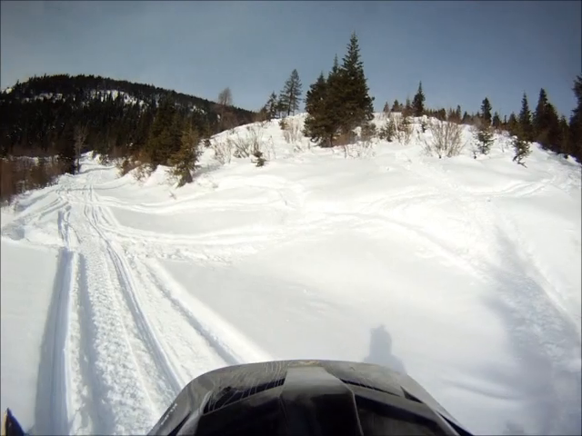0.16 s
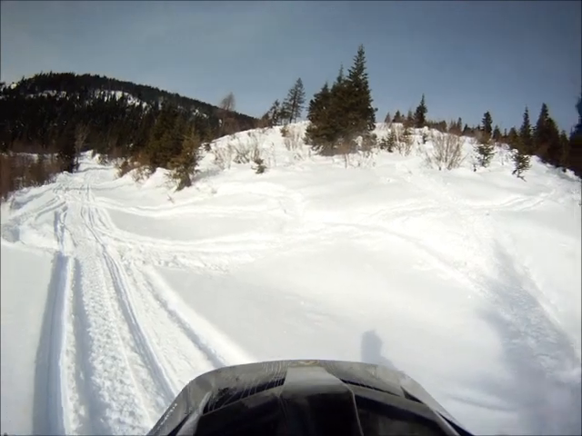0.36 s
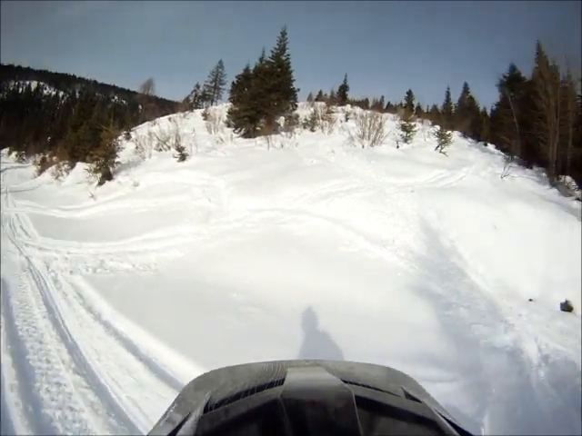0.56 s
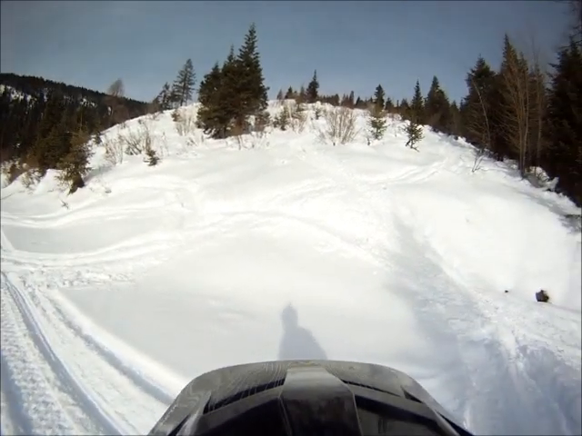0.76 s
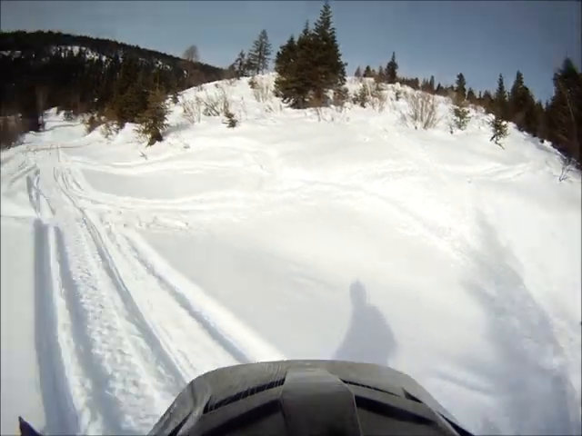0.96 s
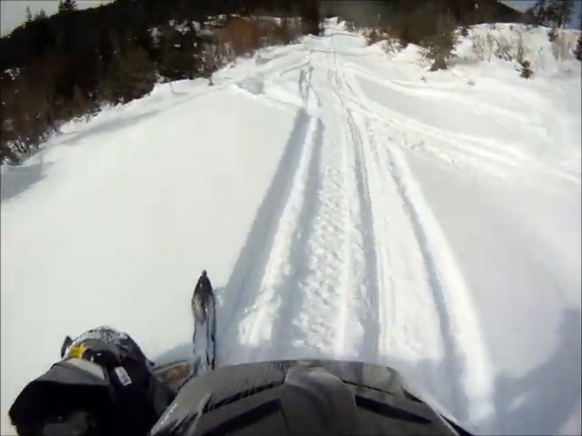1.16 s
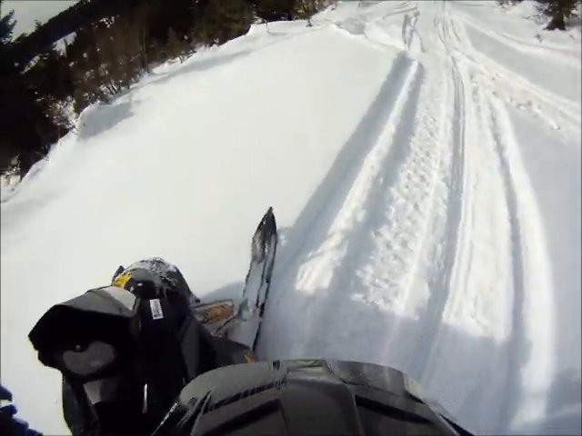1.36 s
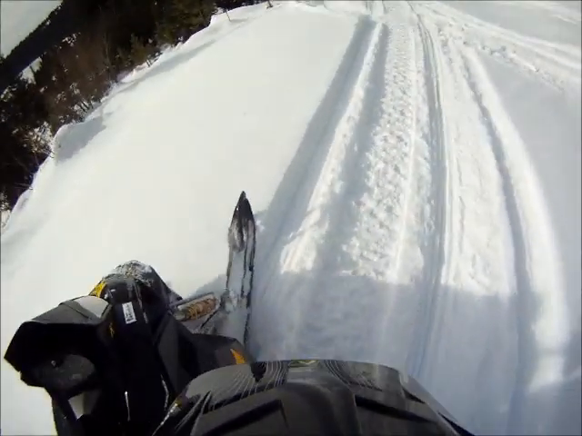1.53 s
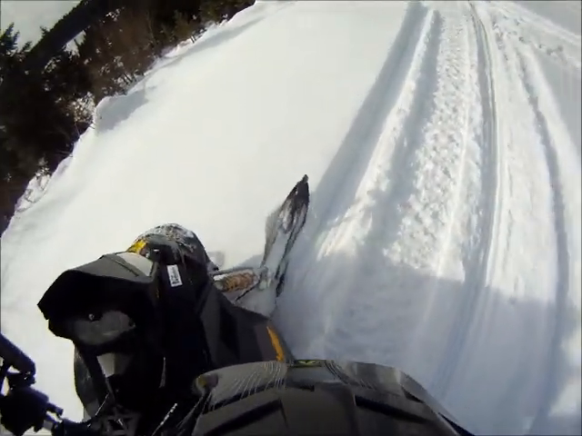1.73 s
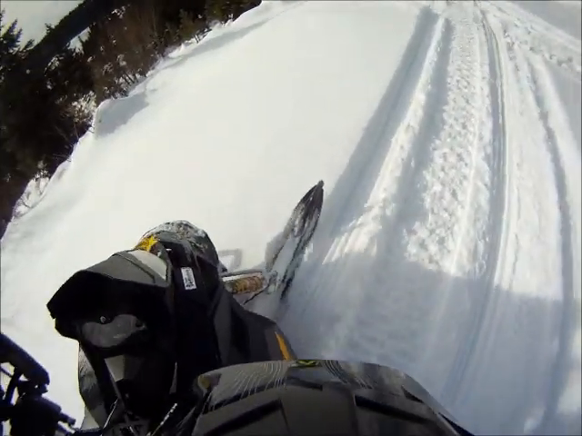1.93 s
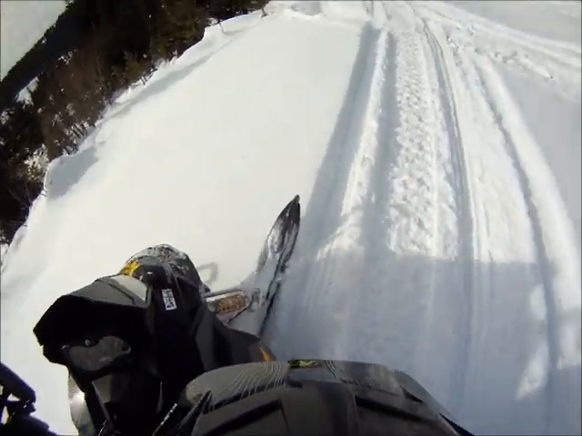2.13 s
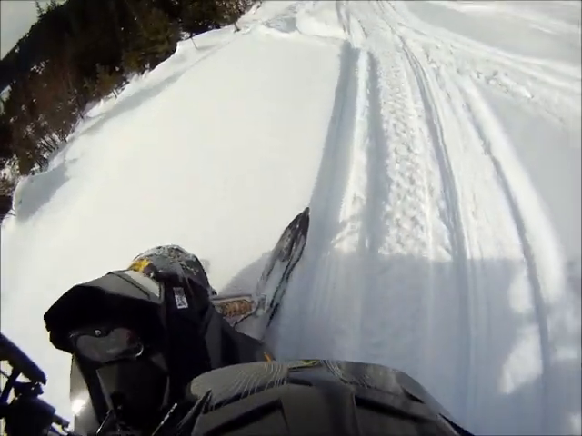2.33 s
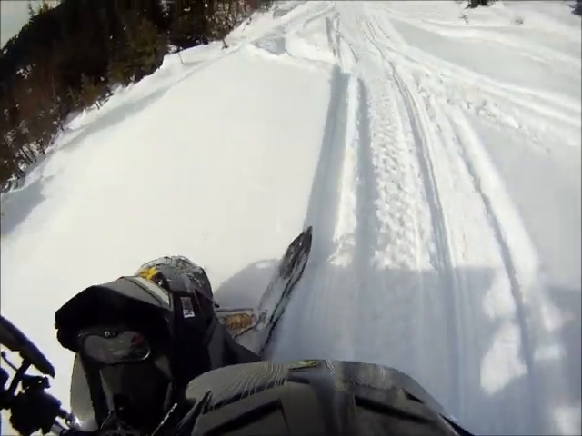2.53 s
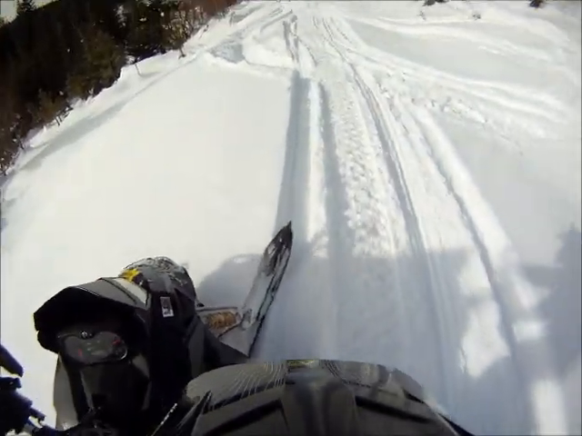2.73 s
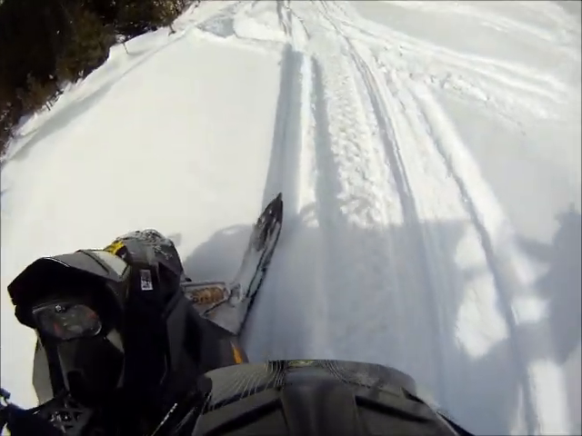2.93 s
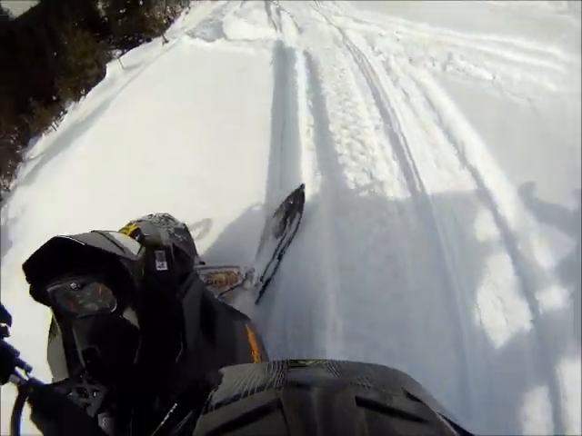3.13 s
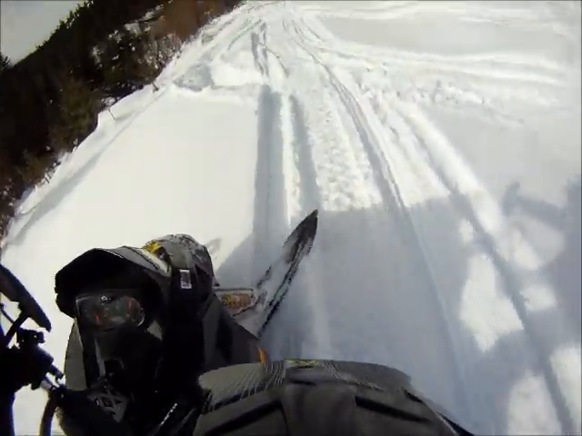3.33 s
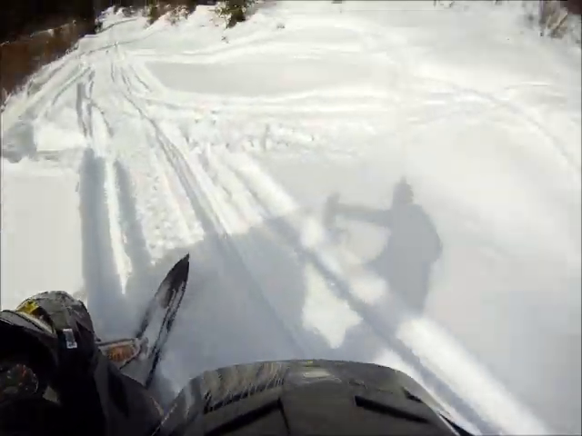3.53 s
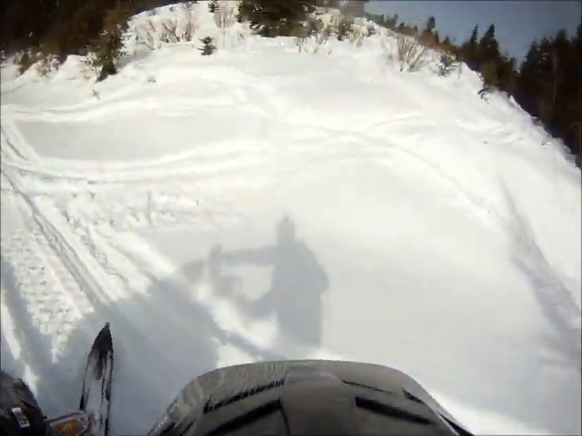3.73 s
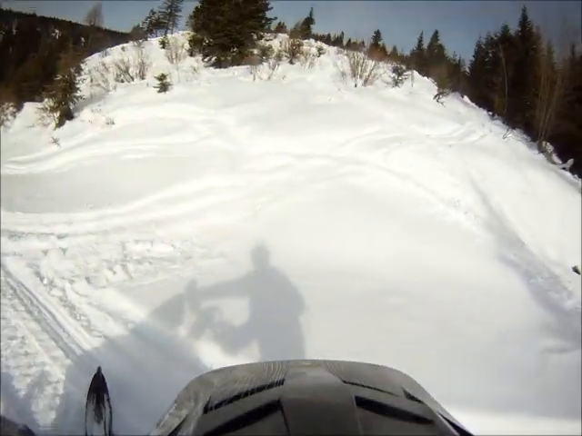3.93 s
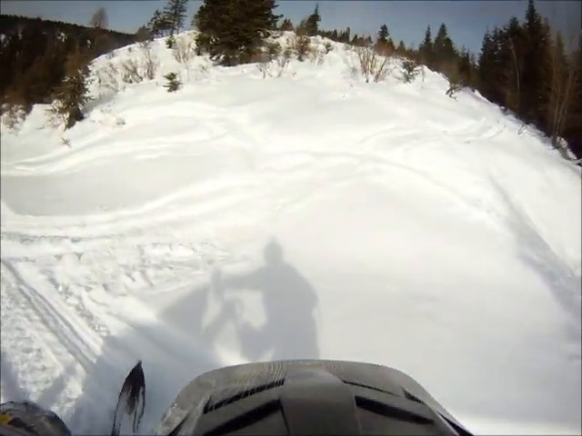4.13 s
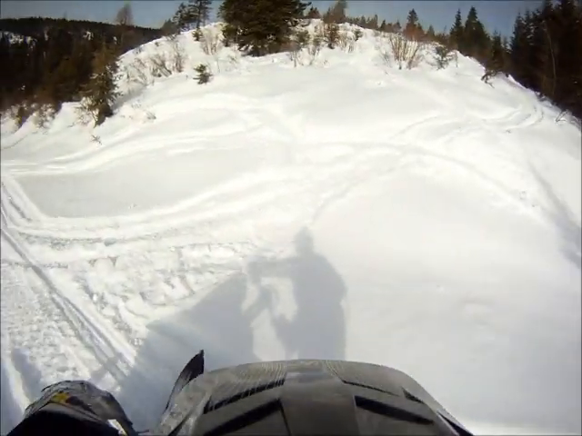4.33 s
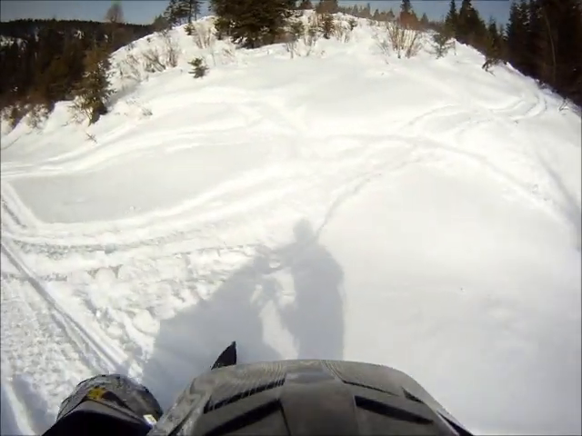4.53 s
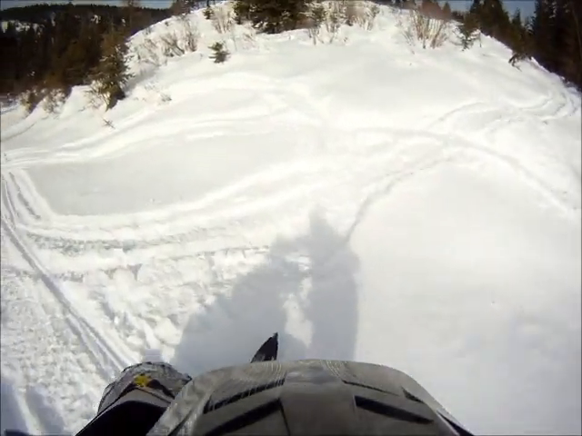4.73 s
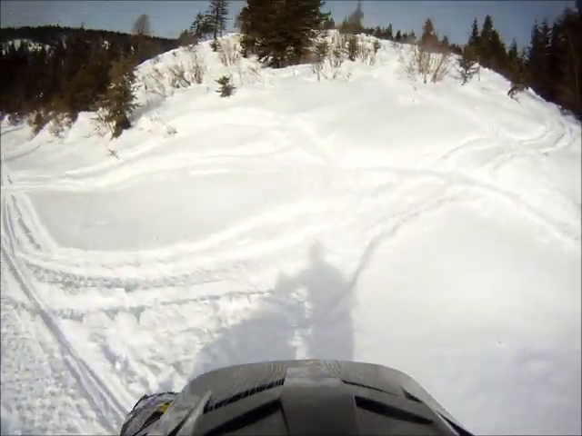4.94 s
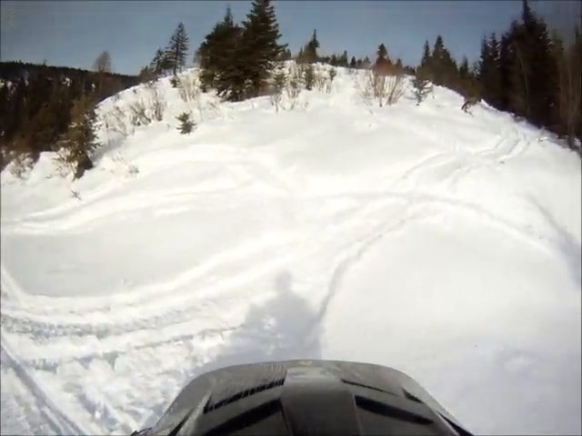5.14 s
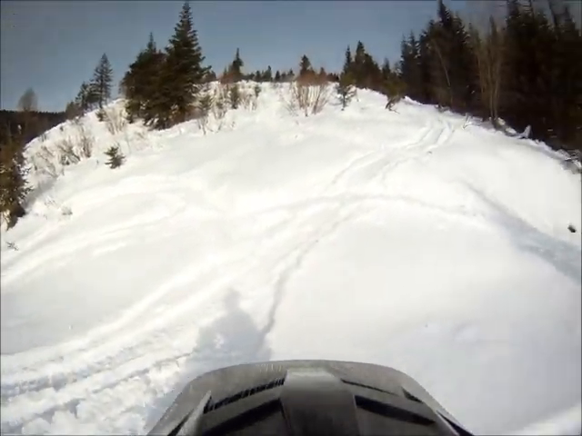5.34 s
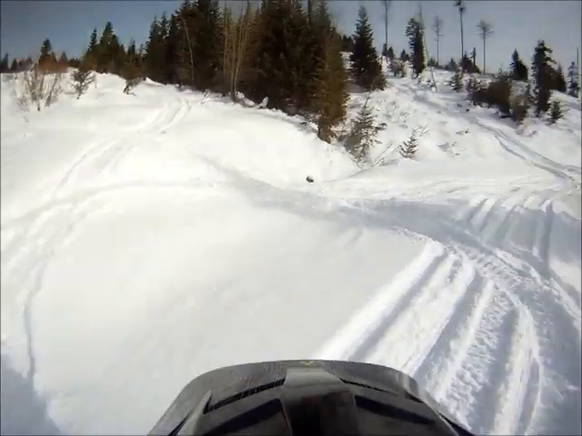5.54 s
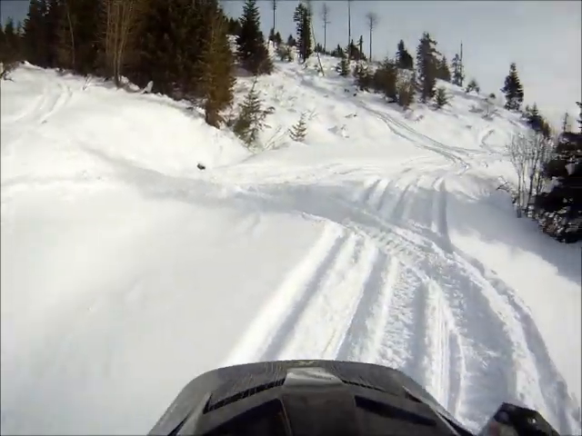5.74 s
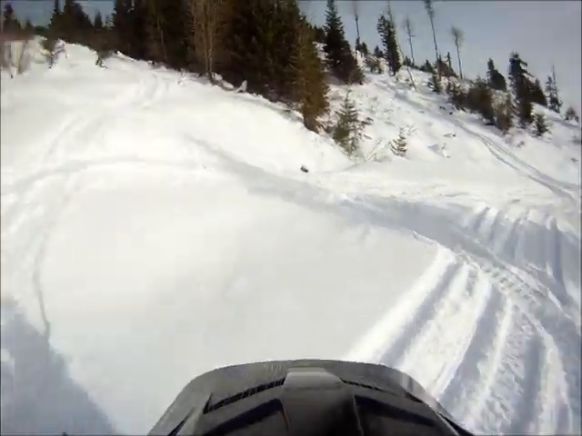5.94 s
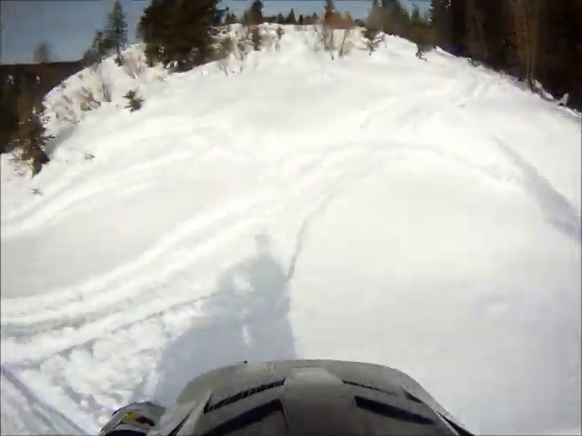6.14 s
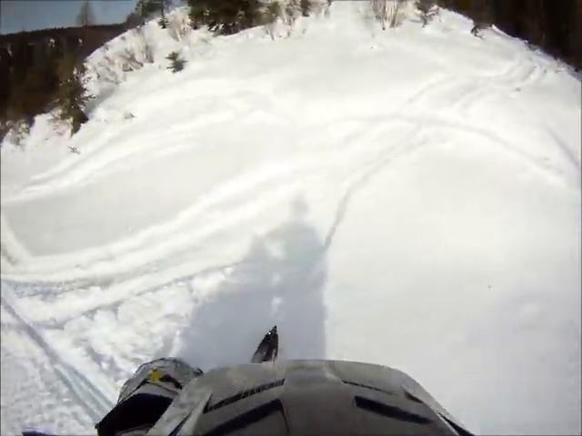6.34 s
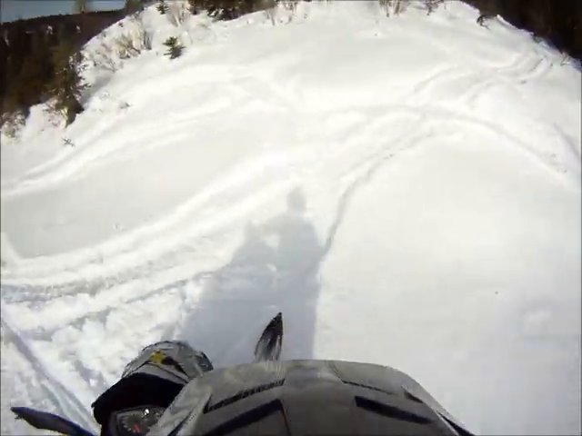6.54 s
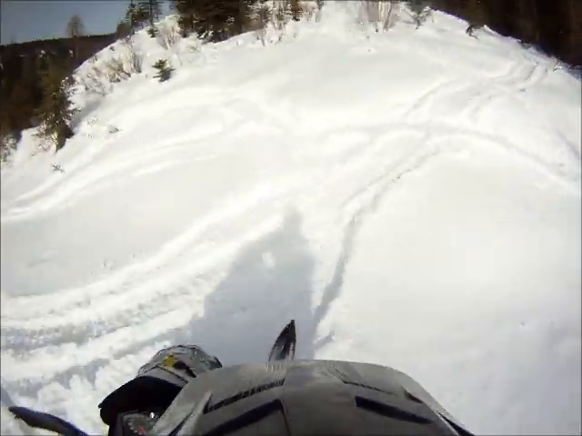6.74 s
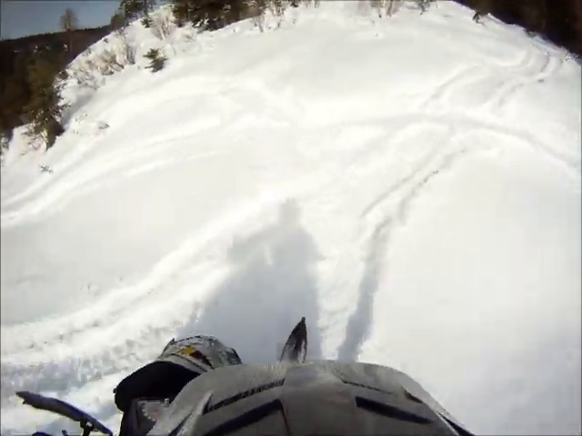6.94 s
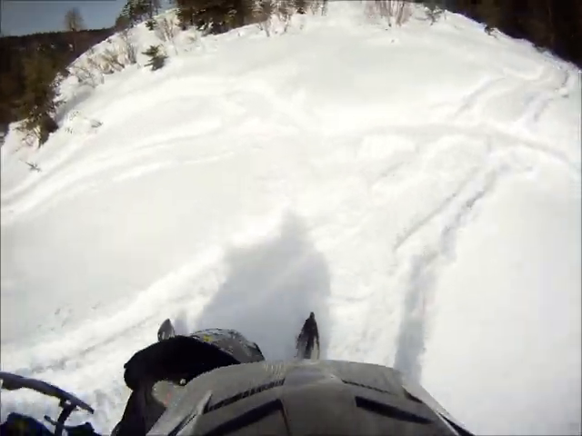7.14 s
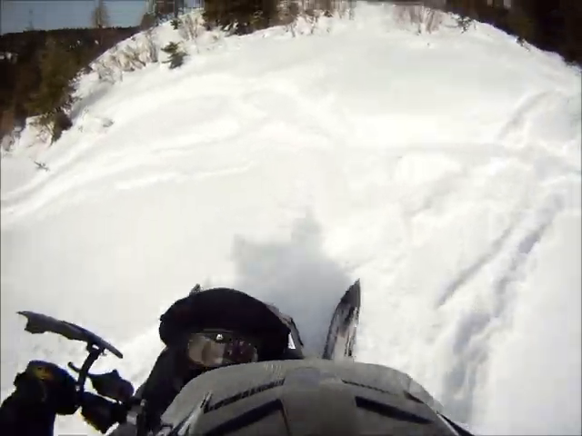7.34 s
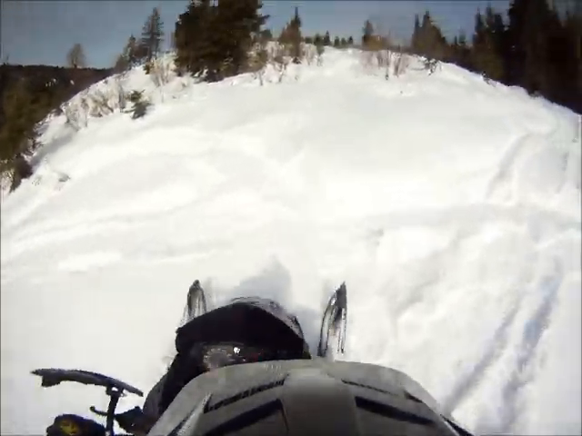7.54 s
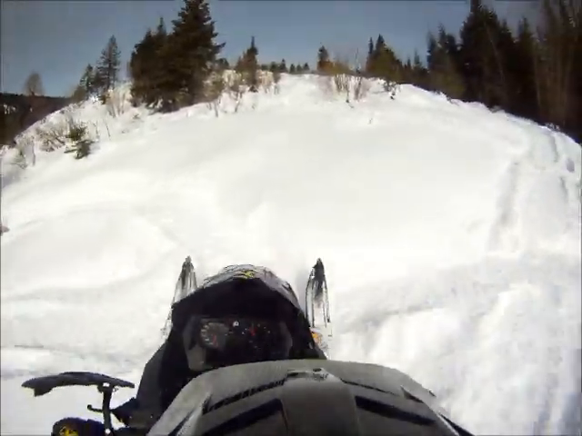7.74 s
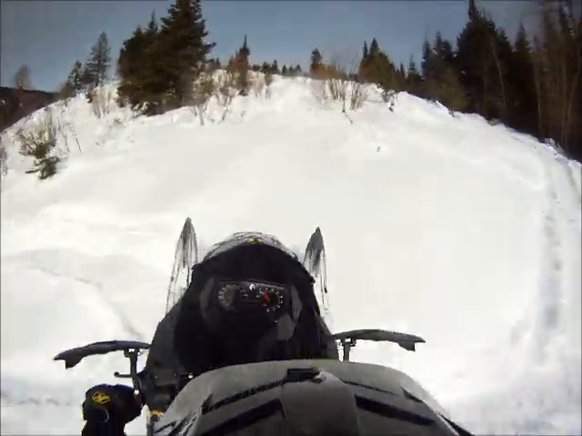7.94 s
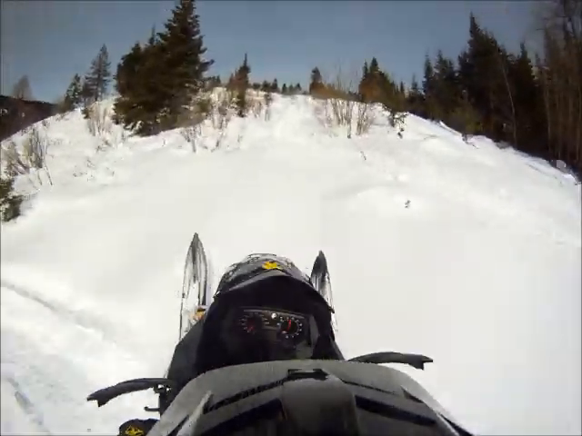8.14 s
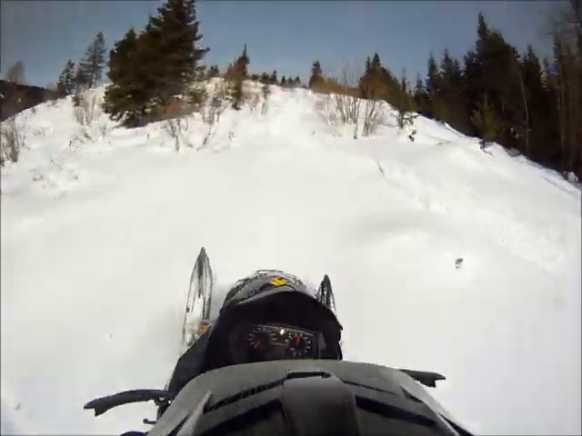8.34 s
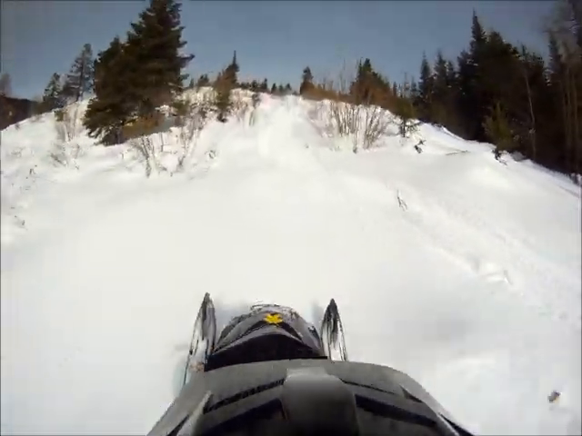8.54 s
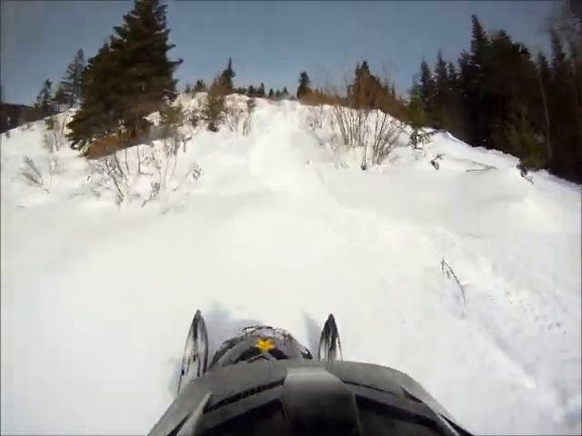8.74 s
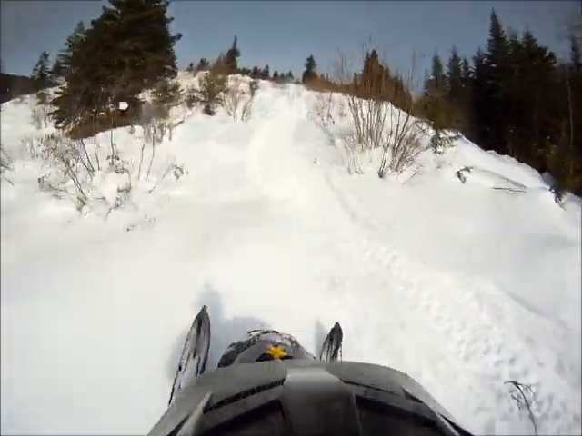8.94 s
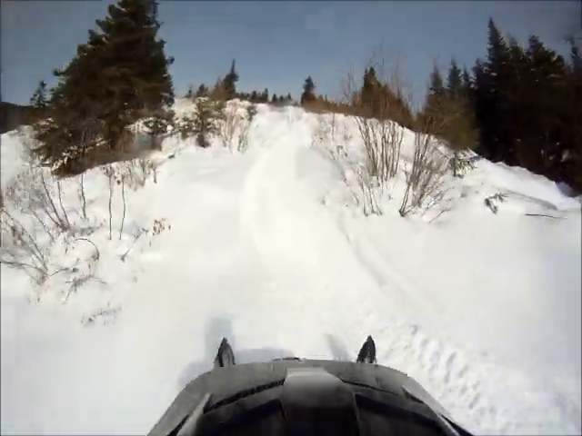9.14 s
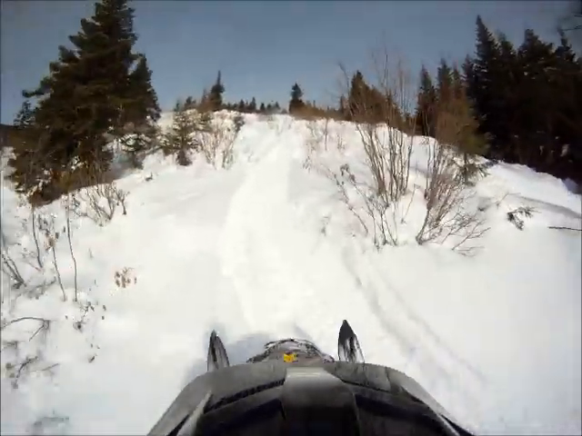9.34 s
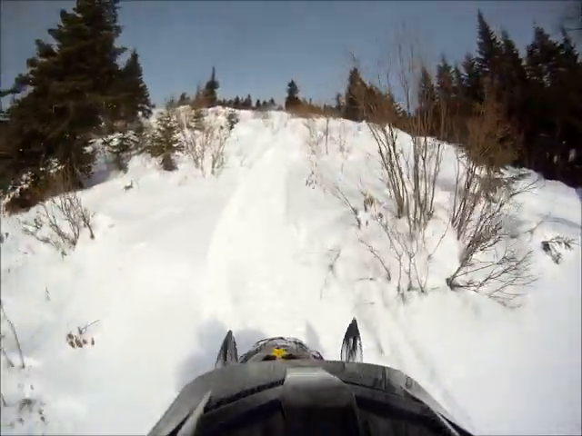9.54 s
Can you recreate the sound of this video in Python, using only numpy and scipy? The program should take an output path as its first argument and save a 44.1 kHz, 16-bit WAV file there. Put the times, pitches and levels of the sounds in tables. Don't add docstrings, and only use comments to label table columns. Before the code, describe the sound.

A low, uneven engine putter with jacket rustle opens the ride. The snowmobile is blipped several times, each rasp sagging into stumbling pops, then calms around the middle. Later surges climb to a loud buzzing whine, with a brief belt chirp and quick on-off bursts at the end. Close rider's microphone in a sealed case, dry open air, harsh low-quality treble.

```python
import sys
import numpy as np
from scipy import signal
from scipy.fft import rfft, irfft, next_fast_len
from scipy.io import wavfile
from scipy.ndimage import uniform_filter1d

SR = 44100
rng = np.random.default_rng(int(sys.argv[2]) if len(sys.argv) > 2 else 0)


def digitize_waveform(pressure):
    field = np.atleast_2d(pressure).T
    bounded = np.clip(field, -1, 1)
    quanta = np.round(bounded * 32767).astype(np.int16)
    wavfile.write(sys.argv[1], SR, quanta)


def elevation(decibels):
    levels = np.asarray(decibels, float)
    return 10 ** (levels / 20)


N = 422914


def level(x, db):
    return x * elevation(db) / np.sqrt(np.mean(x ** 2))


def colour(x, points):
    hz, db = np.transpose(points)
    size = next_fast_len(N)
    bins = np.arange(size // 2 + 1) * SR / size + 1
    gain = elevation(np.interp(np.log(bins), np.log(hz), db, right=-120))
    return irfft(rfft(x, size) * gain, size)[:N]


def ring(x, modes):
    out = 0
    for k, (hz, width, db) in enumerate(modes):
        b, a = signal.iirpeak(hz, hz / width, SR)
        out = out + (-1) ** k * elevation(db) * signal.lfilter(b, a, x)
    return out


def walk(rate):
    k = int(SR / rate / 32)
    steps = np.repeat(rng.standard_normal(N // (32 * k) + 1), k)
    slow = uniform_filter1d(uniform_filter1d(steps, k), k)
    return np.repeat(slow, 32)[:N]


def held(rows, slew_s):
    t = np.arange(N) / SR
    steps = sum(v * (t >= a) * (t < b) for a, b, v in rows)
    return uniform_filter1d(steps, size=int(slew_s * SR))


# frequency in Hz, density in dB per Hz.
WIND_SPECTRUM = [(20, -0.5), (40, -16), (70, -4), (150, -24), (400, -17.5)]


def wind():
    noise = level(colour(rng.standard_normal(N), WIND_SPECTRUM), -49.5)
    return noise * elevation(0.79 * walk(7.6))


# peak in seconds,
# rise and fall in seconds, peak in dB.
SCUFFS = [(.235, 0.039, .04, -48), (.27, .015, 0.036, -41.5), (.347, 0.022, 0.047, -39),
          (.41, 0.027, .02, -53), (.447, 0.034, 0.036, -41.5), (.535, .08, 0.018, -48.5),
          (.597, .012, 0.065, -54), (1.04, .04, .15, -54), (1.14, .008, .008, -53), (4.8, .2, .2, -53),
          (5.43, .01, .09, -68), (5.514, 0.044, 0.29, -48), (5.69, 0.01, 0.052, -53),
          (5.79, .015, .03, -62)]


def rustle():
    grains = rng.standard_normal(N) * elevation(1.5 * walk(150))
    bright = [(2410, 180, 0.66), (2710, 55, -0.92)]
    broad = [(1450, 210, 0), (2070, 170, -5.5), (3560, 1500, -36)]
    grains = ring(ring(grains, bright), bright) + ring(grains, broad)
    t, swell = np.arange(N) / SR, np.zeros(N)
    drop_db = 19
    for s, rise, fall, db in SCUFFS:
        near = slice(int((s - 2 * rise) * SR), int((s + 2 * fall) * SR))
        away = np.maximum((s - t[near]) / rise, (t[near] - s) / fall)
        swell[near] += elevation(db - drop_db * away)
    return level(grains, 0) * swell


# frequency in Hz, density in dB per Hz.
ROAR_SPECTRUM = [(40, -9.5), (90, -12), (160, -4), (250, -9.5), (450, -9), (600, -5), (800, -17),
                 (1000, -4), (2500, -8), (4000, -22), (5600, -24.5), (6000, -58)]


def roar(hz, clatter_db):
    noise = level(colour(rng.standard_normal(N), ROAR_SPECTRUM), 0)
    return noise * elevation(0.54 * clatter_db - 24 + 0.027 * (hz - 147) + 3.8 * walk(18))


# start in seconds, length in seconds, pitch in Hz, level in dB.
BELT_CHIRPS = [
    (8.147, 0.037, 1450, -26.5),
]


def chirps():
    t, out = np.arange(N) / SR, 0
    for s, length, hz, db in BELT_CHIRPS:
        gate = uniform_filter1d(1. * (t > s) * (t < s + length), size=250)
        out = out + elevation(db + 5.5) * gate * np.sin(2 * np.pi * hz * (t - s))
    return out


# time in seconds, peak in dB.
STRAY_FIRINGS = [(.25, -25), (.33, -25), (.428, -26), (0.5, -34.5), (0.593, -24.5), (.753, -30), (.804, -24),
                 (1.04, -27), (1.095, -24), (1.126, -22), (1.234, -25), (4.658, -23), (4.773, -26),
                 (4.854, -26), (4.941, -29), (5.009, -31), (5.113, -32), (5.159, -24), (5.186, -29),
                 (5.274, -26), (5.459, -27), (5.552, -28),
                 (1.565, -24), (1.998, -24), (2.19, -18.5), (2.3, -21), (2.419, -23.5), (2.545, -25),
                    (2.643, -18), (2.779, -19.5), (2.878, -25), (3.164, -24), (3.245, -16.5), (3.391, -16),
                    (3.488, -19.5), (3.574, -23), (3.664, -28), (3.873, -40), (3.922, -25.5), (4.243, -19),
                    (4.329, -20.5), (4.407, -30), (4.435, -23), (4.536, -20.5), (6.928, -18),
                    (7.003, -21.5), (7.068, -24), (8.173, -21), (8.787, -18)]
# first and last time in seconds, gap in seconds, peak in dB.
STUMBLE_RUNS = [
    (1.636, 1.8, .048, -16),
    (5.603, 5.78, .034, -28),
    (5.881, 5.95, .029, -27.5),
    (6.804, 6.86, .025, -23),
    (8.64, 8.7, .045, -20),
    (2.81, 2.86, .033, -30),
]


def kicks():
    runs = [(s, db) for a, b, gap, db in STUMBLE_RUNS for s in np.arange(a, b, gap)]
    s, db = np.transpose(STRAY_FIRINGS + runs)
    out = np.zeros(N)
    out[((s - .01) * SR).astype(int)] = elevation(db)
    return out


# frequency in Hz, width in Hz, level in dB.
SILENCER_BOXES = [(174, 10, 0), (87, 16, -47), (490, 71, 17.5)]


def misfires():
    t = np.arange(6000) / SR - .01
    push = np.exp(-(t / .0011) ** 2)
    push -= .5 * np.exp(-((np.abs(t) - .0035) / .0013) ** 2)
    shape = push + .8 * ring(push, SILENCER_BOXES)
    return signal.fftconvolve(kicks(), elevation(-3.5) * shape / shape.max())[:N]


# frequency in Hz, width in Hz, level in dB.
NUDGED_BOXES = [(170.6, 31, 0.5), (95, 41, -2)]


def putter(turn, opening, clatter_db):
    chance, under_db = .3, -3
    starts = np.flatnonzero(np.diff(np.floor(turn / (2 * np.pi))))
    fires, size = rng.random((N // 100, 2))[:len(starts)].T
    size_db = under_db + 0.56 * clatter_db[starts] + 14 * (size - .5)
    out = np.zeros(N)
    out[starts] = (fires < chance) * (opening[starts] < .15) * elevation(size_db)
    return elevation(31) * ring(uniform_filter1d(out, size=60), NUDGED_BOXES)


# time in seconds, firing rate then in Hz, load until the next move in dB.
THUMB_MOVES = [(0, 123.1, -2), (.52, 108, -2), (1.01, 94, 2), (1.32, 88.8, 1.5), (1.6, 171.7, 0),
               (1.823, 156.1, 2.5), (2.0, 189.9, 1.5), (2.79, 117.3, 1.5), (3.17, 196.9, 1),
               (3.92, 118.6, -3.5), (4.19, 181.5, 0.5), (5.58, 107.5, -6.5), (5.801, 132.4, -3),
               (5.92, 128, -3.5), (6.03, 145, -4), (6.22, 158.6, -1), (6.42, 181.5, -3.5),
               (6.731, 193.2, -0.5), (7.11, 146.9, 2), (7.44, 218.8, 0), (7.71, 261, 0), (7.9, 265.3, 1),
               (8.15, 194, 0), (8.625, 271.5, 1.5), (8.79, 219, -4), (8.91, 225, 1), (9.02, 206.8, -0.5),
               (9.328, 270.6, 0), (9.485, 217, -2), (9.6, 234, 0)]


def speed():
    coast_s, pickup_s, flywheel_s = .31, .22, 0.038
    s, hz, _ = np.transpose(THUMB_MOVES)
    t = np.arange(N) / SR
    row = np.clip(np.searchsorted(s, t) - 1, 0, len(s) - 2)
    since = np.clip(t - s[row], 0, None)
    span, change = np.diff(s)[row], np.diff(hz)[row]
    up = np.diff(hz, prepend=np.inf, append=0) > 0
    rose_before, rises_on = up[row], up[row + 2]
    done = np.clip(since / span, 0, 1)
    lag = pickup_s / span * ~rose_before / (1 + rises_on)
    rise = np.where(rises_on, done, np.sin(np.pi / 2 * done)) ** (1 + lag)
    sag = (1 - np.exp(-since / coast_s)) / (1 - np.exp(-span / coast_s))
    revs = hz[row] + change * np.where(change > 0, rise, sag)
    return uniform_filter1d(revs, size=int(flywheel_s * SR))


# from and to in seconds, opening 0-1.
THROTTLE_OPEN = [(1.32, 2.0, .5), (2.86, 3.17, .5), (3.92, 4.19, .5), (5.6, 5.8, .42), (5.92, 6.73, .7),
                 (6.73, 6.9, .2), (7.12, 7.9, 1), (8.15, 8.625, 1), (8.78, 8.92, .7), (9.03, 9.328, .9),
                 (9.485, 9.59, 1)]
# firing rate in Hz, first, second and third tone in dB, clatter in dB.
ENGINE_PULLING = [(90, -36, -44.5, -51, -38.5), (135.5, -35, -45.5, -48, -32.5),
                  (164.7, -37.5, -41.5, -34, -27.5), (186, -33.5, -32.5, -44, -23),
                  (200.7, -37.5, -37.5, -43, -21.5), (203.7, -30, -37, -48, -20.5),
                  (238.4, -28, -28.5, -36.5, -15), (286, -27.5, -18, -49, -14.5)]
# firing rate in Hz, first, second and third tone in dB, clatter in dB.
ENGINE_COASTING = [(94, -57, -56, -56, -48), (110, -53.5, -65.5, -53, -42.5), (129.2, -53.5, -48, -56, -37),
                   (151.5, -40, -54, -43, -33), (170.3, -43, -45, -48, -28), (179.97, -49, -47, -51.5, -28),
                   (224, -31.5, -45, -54, -26.5), (244.5, -30, -33.5, -42, -22)]


def loudness(hz):
    load_slew_s, snap_s = 0.059, 0.0027

    def read(rows):
        rate, *columns = np.transpose(rows)
        return np.array([np.interp(hz, rate, column) for column in columns])

    pulling, coasting = read(ENGINE_PULLING), read(ENGINE_COASTING)
    loads = [(a[0], b[0], a[2]) for a, b in zip(THUMB_MOVES, THUMB_MOVES[1:])]
    load_db = held(loads, load_slew_s)
    gas = [(a, b, min(2 * opening, 1.)) for a, b, opening in THROTTLE_OPEN]
    gain_db = pulling - coasting
    tones_db = coasting[:3] + held(gas, snap_s) * gain_db[:3] + 1.2 * load_db
    clatter_db = coasting[3] + held(gas, load_slew_s) * gain_db[3] + load_db
    return tones_db, clatter_db


# frequency in Hz, width in Hz, level in dB.
CASE_MODES = [(689.6, 16, -14.5), (875, 17, -13.5), (1050, 35, -26), (1130.6, 36.6, 0), (1441, 45, 1),
              (1690, 41, -1.5), (1814, 48, 0), (2078, 112, -4.5), (2347, 175, -12.5), (2397, 77, -10.5),
              (2580, 85, -22)]
# frequency in Hz, width in Hz, level in dB.
COWL_MODES = [(3025, 256, -17), (3635, 188, -13.5), (4340, 185, -26.5), (4710, 200, -28.5),
              (5340, 370, -28.5)]
# frequency in Hz, width in Hz, level in dB.
TAIL_PIPE = [(650, 95, -19), (806, 280, -35.5), (1088, 158, -7), (1133.6, 71, -0.5), (1391, 122, -5),
             (1676, 180, -2.5), (1773, 187, -2), (2084, 205, -6)]


def clatter(turn, hz, opening, clatter_db):
    cycle = np.floor(turn / (2 * np.pi)).astype(int)
    phase = turn / (2 * np.pi) % 1
    size = elevation(1.02 * rng.standard_normal(N // 50)[cycle] - 0.72 * (cycle % 2))
    gas = (1.04 + np.exp(-phase / .5)) * size * rng.standard_normal(N)
    start = 2 * np.pi * rng.random(50)
    orders = np.zeros(N)
    for k in range(8, 40):
        orders += elevation(3.5 * walk(12) - 5.5 * (k % 2)) * np.sin(k * turn / 2 + start[k])
    orders = orders * np.sqrt(hz)
    clean = .25 + .52 * opening
    steep = signal.butter(4, 2350, fs=SR, output="sos")
    lines = level(signal.sosfilt(steep, ring(orders, TAIL_PIPE)), 0)
    cowl = elevation(0.22 * (clatter_db + 28.5)) * ring(gas, COWL_MODES)
    case = level(ring(gas, CASE_MODES) - cowl, 0)
    swell = elevation(clatter_db + walk(12))
    return swell * (elevation(-2.15) * lines * np.sqrt(clean) + case * np.sqrt(1 - clean))


# frequency in Hz, width in Hz, level in dB.
MUFFLER_MODES = [(436, 66, 1.5), (555, 39, -1.5), (701, 68, -2), (796, 80, -4.5), (888, 63, 0)]


def ladder(turn, opening, clatter_db):
    waver_db, odd_db = 4, -2
    orders = np.zeros(N)
    for k in range(5, 16):
        orders += elevation(waver_db * walk(10) + odd_db * (k % 2)) * np.sin(k * turn / 2 + k ** 2)
    push_db = -24.5 + 0.77 * clatter_db + 3 * opening
    return ring(ring(orders, [(740, 800, 0)]), MUFFLER_MODES) * elevation(push_db)


# from and to in seconds, multiple of the firing rate, level
# in dB.
SINGING_ORDERS = [(1.11, 1.403, 5, -55), (4.698, 5.548, 4, -52.5), (5.593, 5.766, 4, -46),
                  (6.22, 6.32, 7, -33), (6.57, 6.69, 6, -29), (7.56, 7.9, 7, -24), (7.547, 7.879, 8, -22.5),
                  (7.621, 7.914, 4, -27), (7.703, 7.9, 5, -33), (8.3, 8.52, 6, -28),
                  (8.452, 8.629, 4, -23.5), (8.501, 8.631, 5, -27), (9.215, 9.335, 4, -37),
                  (9.49, 9.599, 5, -25), (9.484, 9.51, 3, -21), (9.51, 9.6, 3, -33), (9.484, 9.602, 2, -24),
                  (7.8, 7.899, 3, -36), (8.7, 8.931, 2, -33), (8.7, 8.95, 1, -33), (5.59, 5.789, 1, -41.5),
                  (0.0, .9, 2, -53), (0.0, .7, 4, -57), (8.201, 8.42, 5, -30.5), (8.35, 8.619, 3, -35),
                  (9.05, 9.25, 5, -35), (3.103, 3.172, 1, -31.5), (4.132, 4.19, 1, -36),
                  (7.3, 7.68, 5, -32.5)]


def singing(turn):
    out = np.zeros(N)
    for start, end, order, db in SINGING_ORDERS:
        near = slice(int((start - .05) * SR) if start > .05 else int((start - .05) * SR),
                     int((end + .05) * SR))
        t = np.arange(N)[near] / SR
        gate = uniform_filter1d(1. * (t > start) * (t < end), size=600)
        out[near] += elevation(db + 3 + 2 * walk(28)[near]) * gate * np.sin(order * turn[near])
    return out


# multiple of the firing rate, level in dB.
UNEVEN_ORDERS = [(.5, -6), (1.5, 0), (2.5, -3), (3.5, -7.5)]
# frequency in Hz, width in Hz, level in dB.
PIPE_MODES = [(89, 59, -2.5), (159, 19.3, 4), (256, 156, -15), (472, 117, -2.5), (693, 13, -5),
              (840, 33, -26.5)]


def exhaust(turn, tones_db, clatter_db):
    tones, extra = np.zeros(N), np.zeros(N)
    for k, db in enumerate(tones_db):
        tones += elevation(db + 2.65 * walk(25)) * np.sin((k + 1) * turn + 1.34 * k ** 2)
    for order, db in UNEVEN_ORDERS:
        extra += elevation(db + 3.4 * walk(12)) * np.sin(order * turn + order ** 2)
    return np.sqrt(2) * tones + ring(extra * elevation(0.58 * clatter_db - 21.5), PIPE_MODES)


def scene():
    hz = speed()
    tones_db, clatter_db = loudness(hz)
    opening = held(THROTTLE_OPEN, .02)
    turn = 2 * np.pi * np.cumsum(hz * (1 + 0.002003 * walk(40))) / SR
    near_mic = wind() + elevation(6.5) * rustle()
    machine = roar(hz, clatter_db) + chirps()
    firing = misfires() + putter(turn, opening, clatter_db)
    rasp = clatter(turn, hz, opening, clatter_db) + ladder(turn, opening, clatter_db)
    tones = singing(turn) + exhaust(turn, tones_db, clatter_db)
    return (near_mic + machine + firing + rasp + tones)[None]


def roll_off(x):
    return signal.sosfilt(signal.butter(12, 15630, fs=SR, output="sos"), x)


# frequency in Hz, width in Hz, depth 0-1.
CASE_DIPS = [(616, 39, 0.9), (759, 57, 0.77), (954, 73, 0.46), (1300, 67, 0.5), (1670, 21, 0.53),
             (2840, 150, 0.63), (3440, 40, 0.2), (4230, 250, 0.7), (4520, 140, 0.34), (5600, 320, 0.57)]


def record(dry):
    store_hz, repeats = 12000, 4
    for hz, width, depth in CASE_DIPS:
        b, a = signal.iirpeak(hz, hz / width, SR)
        dry = dry - depth * signal.lfilter(b, a, dry)
    stored = signal.resample_poly(dry, store_hz // 300, SR // 300, axis=1)
    stepped = np.repeat(stored, repeats, axis=1)
    out = signal.resample_poly(stepped, SR // 300, repeats * store_hz // 300, axis=1)[:, :N]
    return roll_off(np.pad(out, ((0, 0), (0, N - out.shape[1]))))


dry = scene()
out = record(dry)
digitize_waveform(out)
```